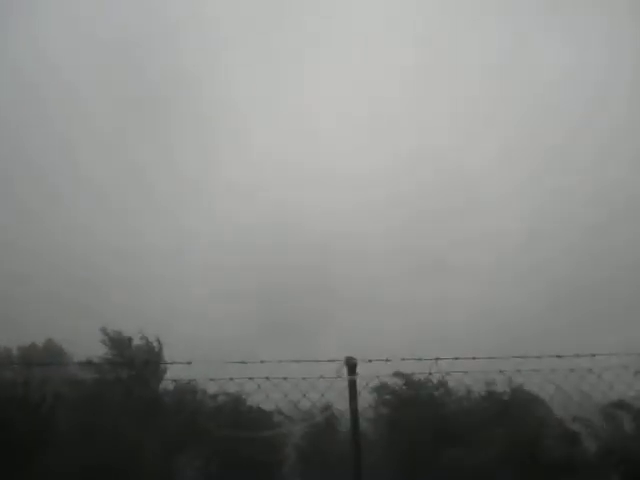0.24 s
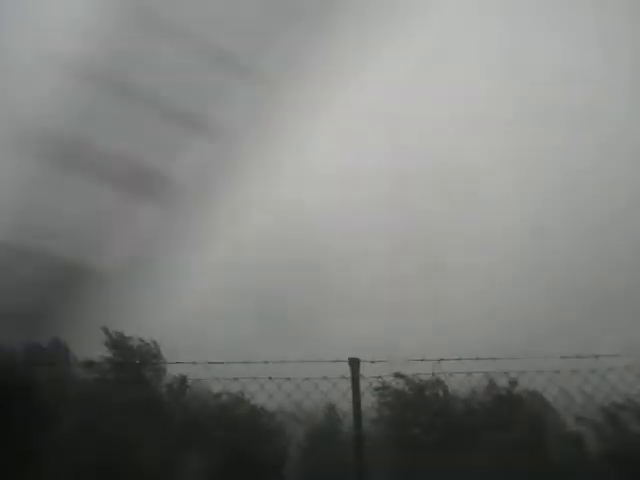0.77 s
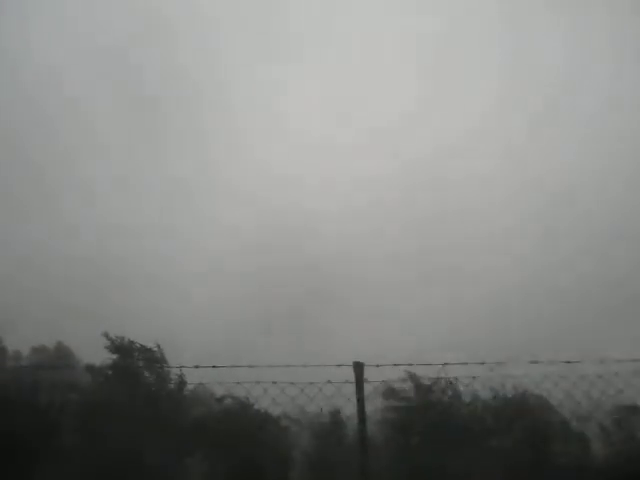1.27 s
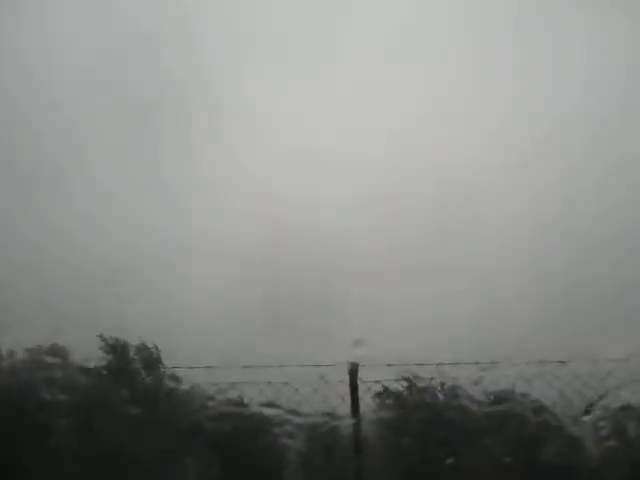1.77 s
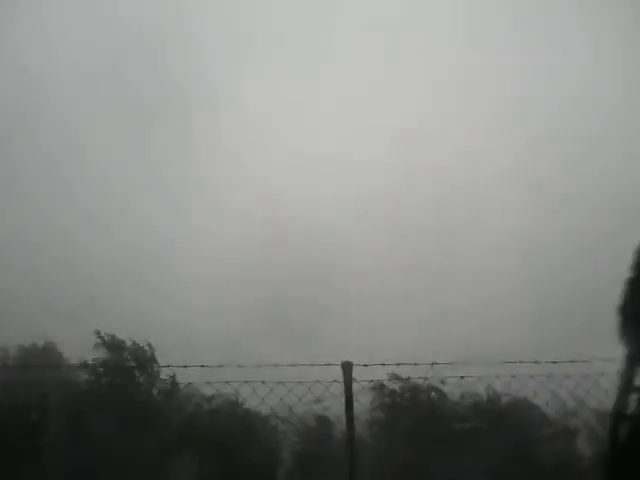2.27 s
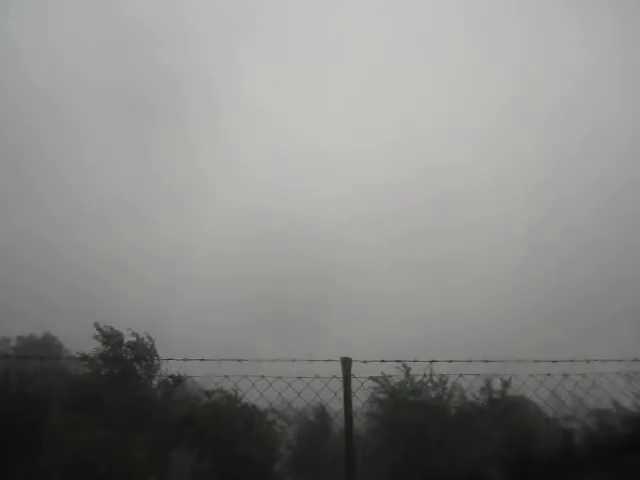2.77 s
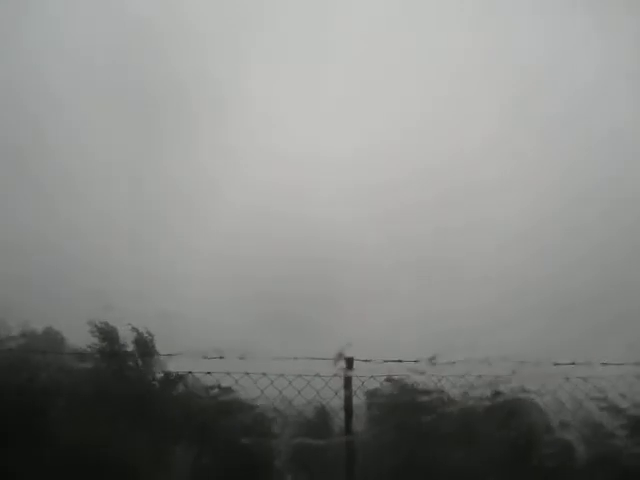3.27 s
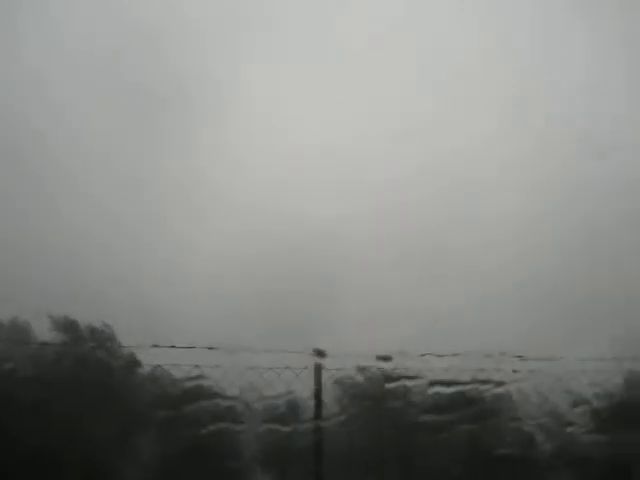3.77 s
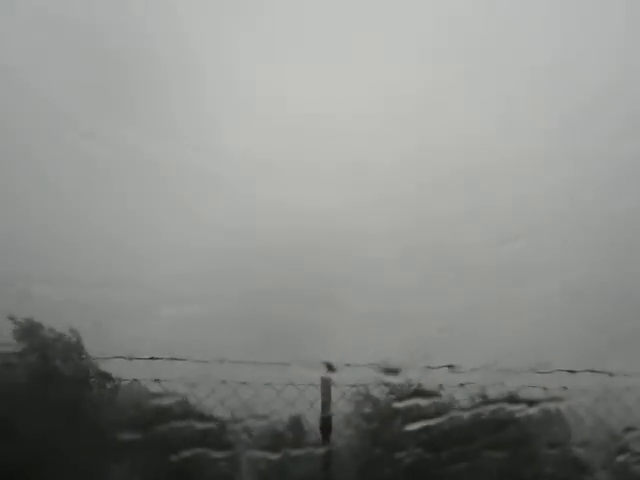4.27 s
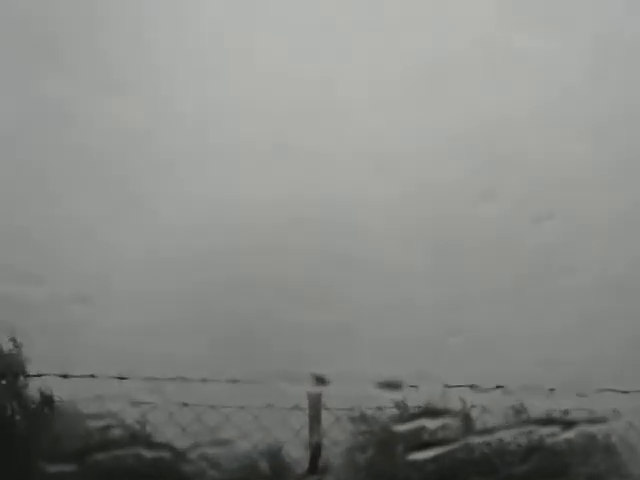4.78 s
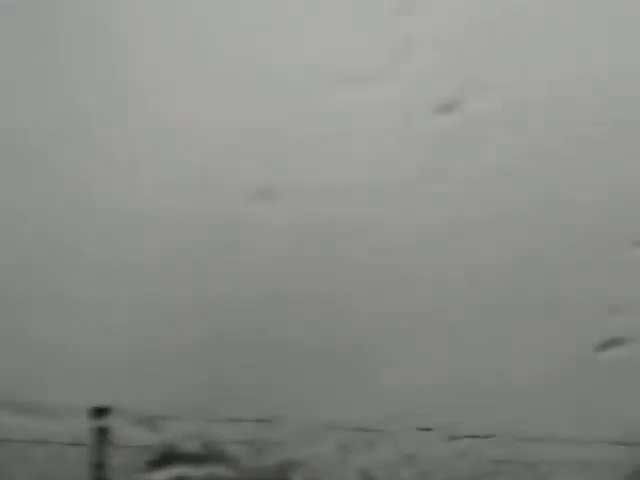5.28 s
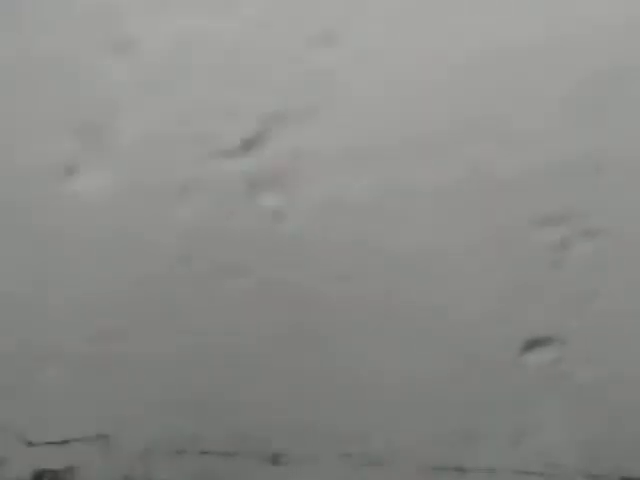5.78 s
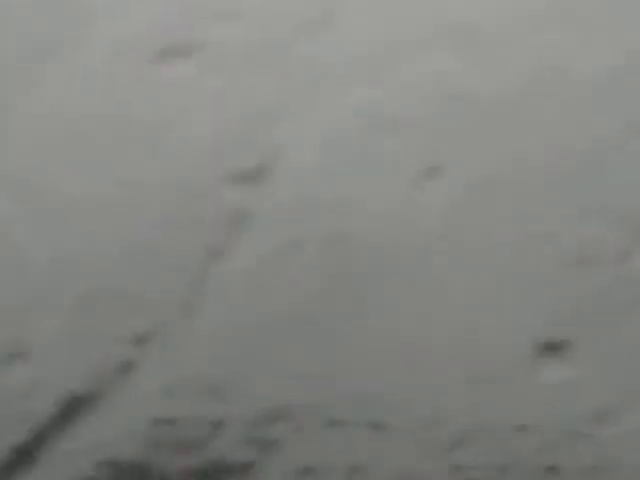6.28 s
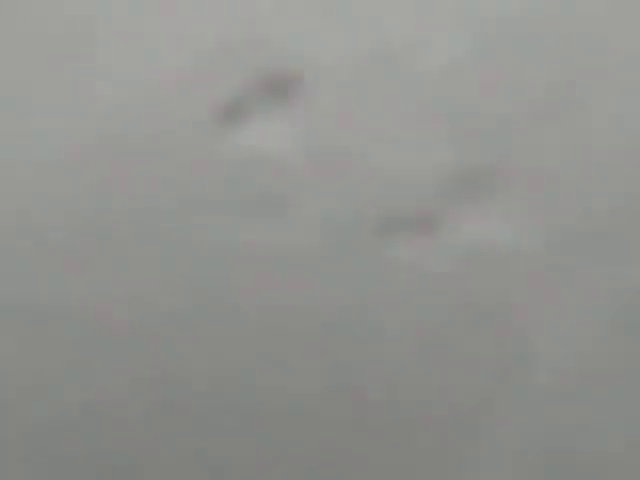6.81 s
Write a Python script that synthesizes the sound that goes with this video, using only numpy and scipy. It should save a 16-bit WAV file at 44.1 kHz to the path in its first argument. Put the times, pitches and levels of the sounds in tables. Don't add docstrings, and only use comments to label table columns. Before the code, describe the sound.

Inside a storm-shaken car, sheets of rain and low thuds give way to handling clicks, dulled rain, and harsh fluttering air blasts

```python
import sys
import numpy as np
from scipy import signal
from scipy.fft import rfft, irfft, next_fast_len
from scipy.io import wavfile
from scipy.ndimage import uniform_filter1d

SR = 44100
rng = np.random.default_rng(int(sys.argv[2]) if len(sys.argv) > 2 else 0)


def file_out(sig):
    cols = np.atleast_2d(sig).T
    lim = np.clip(cols, -1, 1)
    pcm = np.round(lim * 32767).astype(np.int16)
    wavfile.write(sys.argv[1], SR, pcm)


def amplitude_ratio(level_db):
    exponent = np.asarray(level_db, float) / 20
    return 10 ** exponent


N = 310772
STEP_S = .001

# (time [s], share [0-1])
SHADE = [
    (0, 0.04),
    (3.5, 0.06),
    (3.62, 0.28),
    (4.7, 0.43),
    (4.95, 0.04),
    (5.3, 0.05),
    (6.4, 0.05),
    (6.8, 0.1),
    (7.05, 0.04),
]


def unit(x):
    return x / np.sqrt(np.mean(x ** 2) + 1e-18)


def steps():
    return np.arange(0, N / SR + STEP_S, STEP_S)


def curve(s, v):
    return np.interp(np.arange(N) / SR, s, v)


def band(x, lo_hz, hi_hz, order=2):
    return signal.sosfilt(signal.butter(order, [lo_hz, min(hi_hz, .47 * SR)], "band", fs=SR, output="sos"), x)


def low(x, hz):
    return signal.sosfilt(signal.butter(3, hz, fs=SR, output="sos"), x)


def colour(x, spectrum):
    size = next_fast_len(len(x))
    hz = np.maximum(np.fft.rfftfreq(size, 1 / SR), 1)
    point_hz, point_db = np.transpose(spectrum)
    db = np.interp(np.log(hz), np.log(point_hz), point_db, left=-90)
    return irfft(rfft(x, size) * amplitude_ratio(db), size)[:len(x)]


def walk(rate):
    hold = int(SR / rate)
    levels = rng.standard_normal(N // 8)[:N // hold + 1]
    return 0.678 * uniform_filter1d(np.repeat(levels, hold)[:N], hold)


def drops(rate, spread_db):
    hit = rng.random(N) < rate / SR
    return unit(hit * rng.standard_normal(N) * amplitude_ratio(spread_db * rng.exponential(size=N)))


def steady(x, lo_hz, hi_hz):
    return x / np.sqrt(uniform_filter1d(band(x, lo_hz, hi_hz) ** 2, SR // 2) + 1e-18)


def swell_db(start_s, hold_s, rise_s, fall_s):
    early = np.maximum(start_s - steps(), 0)
    late = np.maximum(steps() - start_s - hold_s, 0)
    return -20 * (early / rise_s + late / fall_s)


def storm_db():
    # (time [s], level [dB])
    strength = [(0, -37.5), (.26, -41), (.58, -39.5), (1.76, -38.5), (1.86, -40.5), (2.19, -45.5),
                (2.33, -36), (2.5, -34), (2.77, -39.5), (3.1, -40), (3.5, -42), (4.5, -48.5), (4.86, -46.5),
                (5.02, -37), (5.62, -32), (6.62, -37.5), (6.82, -39), (7.05, -30)]
    # (time [s], swell [dB], half length [s])
    sheets = [
        (0.702, 4, 0.112),
        (0.911, 2.5, 0.062),
        (1.157, 3, 0.0213),
        (1.216, 3.5, 0.0636),
        (1.352, 3.5, 0.104),
        (1.593, 2.5, 0.0237),
        (1.654, 4, 0.0925),
        (2.368, 2, 0.0454),
        (2.948, 3, 0.1336),
    ]
    swells = sum(db * np.exp(-((steps() - s) / half_s) ** 4) for s, db, half_s in sheets)
    return np.interp(steps(), *np.transpose(strength)) + swells


def rain(roof_db, glass_db):
    # (frequency [Hz], density [dB per Hz])
    open_spectrum = [(140, -40), (250, 5), (560, 12.5), (680, 5.5), (1140, 9), (1500, 0.5), (1950, -5),
                     (2300, -15), (3250, -7.5), (3870, -14.5), (4500, -14.5), (5320, -26), (6400, -24.5),
                     (7400, -33), (15900, -49.5)]
    shaded_spectrum = [(150, -31), (230, -16), (320, -16), (560, -14), (700, -16.5), (880, -8), (1400, -14),
                       (1860, -2.5), (2150, -28.5), (3300, -43.5), (4500, -40.5), (5500, -35), (15900, -45)]
    shade = np.clip(curve(*np.transpose(SHADE)), 0, 1)
    wash = rng.standard_normal(N) + .3 * drops(2500, spread_db=2.0)
    wash = wash * amplitude_ratio(.7 * walk(25) + .9 * walk(90))
    heard = (1 - shade) * unit(colour(wash, open_spectrum)) + shade * unit(colour(wash, shaded_spectrum))
    roof = signal.sosfiltfilt(signal.butter(6, 2250, fs=SR, output="sos"), heard)
    glass = heard - roof
    return steady(roof, 500, 1900) * amplitude_ratio(roof_db + .6) + steady(glass, 2500, 5500) * amplitude_ratio(glass_db + .6)


def shoves(steady_db):
    # (time [s], boom [dB], shudder [dB], time to fade 20 dB [s])
    gusts = [(0.01, -19, -34, 0.1867), (.45, -30.5, -32, 0.13), (.66, -29, -42, 0.19), (.9, -33, -36, 0.27),
             (1.05, -23, -30.5, 0.13), (1.43, -21.5, -34, 0.13), (1.53, -25.5, -32, 0.11),
             (1.66, -20, -29.5, 0.09), (1.74, -24, -24.5, 0.32), (1.93, -34, -33.5, 0.22),
             (2.22, -36, -55, 0.23), (2.36, -29, -38, 0.02), (2.43, -26, -30, 0.05),
             (2.49, -25, -46.5, 0.38), (3.385, -19.5, -43, 0.3032), (3.59, -29, -39.5, 0.13),
             (3.67, -26, -45.5, 0.28), (4.04, -37, -61.5, 1.26), (4.44, -28.5, -45.5, 0.07),
             (4.55, -35, -46, 0.31), (5.04, -31.5, -36.5, 0.11), (5.13, -21.5, -33, 0.116),
             (5.225, -37, -38.5, 0.1469), (5.47, -43, -48, .2), (5.95, -18.5, -43, 0.1662),
             (6.04, -25, -34, 0.05), (6.14, -23.5, -40.5, 0.265), (6.23, -21, -38, 0.09),
             (6.29, -22.5, -37, 0.093), (6.62, -33, -43, 0.3)]
    power = amplitude_ratio(2 * (steady_db + np.array([[-39.5], [-38.5]])))
    for s, boom_db, shudder_db, fade_s in gusts:
        swell = swell_db(s, 0.0253, 0.0634, fade_s)
        power = power + amplitude_ratio(2 * (swell + np.array([[boom_db], [shudder_db]])))
    return 10 * np.log10(power)


def body(boom_db, shudder_db):
    air = band(rng.standard_normal(N), 18, 56, order=3)
    boom = unit(air) * amplitude_ratio(boom_db - 0.75 + 0.799 * walk(11))
    panels = band(rng.standard_normal(N), 84.6, 201.9)
    shudder = unit(panels) * amplitude_ratio(shudder_db + 2.5 + 2.97 * walk(30))
    return boom + shudder


def thumps():
    # (time [s], peak [dB], ring [Hz], decay [ms])
    jolts = [(0.52, -20, 109.3, 16.6), (1.019, -17.5, 120.4, 12), (1.04, -14, 95.3, 19.6),
             (1.42, -19, 70.8, 19.8), (1.979, -18, 170.3, 19.7), (2.349, -24, 112, 24.5),
             (2.479, -18.5, 91.5, 20.4), (3.068, -20.5, 111.4, 17.5), (3.811, -29.5, 385.3, 7),
             (4.438, -25, 119.2, 14.1), (6.618, -28, 341.6, 7.8)]
    out, ms = np.zeros(N), np.arange(6000) / SR * 1000
    for s, db, hz, decay_ms in jolts:
        at = int(s * SR)
        ring = np.sin(2 * np.pi * hz * ms / 1000) * np.exp(-ms / decay_ms)
        out[at:at + len(ms)] += amplitude_ratio(db) * ring * (1 - np.exp(-ms / 1.9))
    return out


def port(x):
    vent_hz, q = 125, .65
    w = np.tan(np.pi * vent_hz / SR)
    return signal.lfilter([1, -2, 1], [1 + w / q + w * w, 2 * (w * w - 1), 1 - w / q + w * w], x)


def flutter():
    # (start [s], length [s], low buffet [dB], rasp [dB], drift over the blast [dB])
    blasts = [(3.601, .03, -42, -41, 7), (4.949, 0.114, -46.5, -44, 4.5), (5.094, 0.066, -37, -40.5, 5.5),
              (5.161, 0.0616, -29.5, -34, -8), (5.453, 0.0122, -59.5, -55.5, -1.5),
              (5.534, 0.0146, -44.5, -43, -0.5), (5.883, 0.034, -43, -48.5, 12.5),
              (5.92, 0.0404, -30, -34.5, 6), (5.959, 0.0885, -21.5, -29.5, -4.5),
              (6.102, .037, -26, -24.5, -2), (6.141, 0.0376, -29, -26, -6.5),
              (6.178, 0.124, -37.5, -36.5, 1), (6.298, 0.1437, -28, -35, -17)]
    # (frequency [Hz], density [dB per Hz])
    rasp_spectrum = [(200, -9), (600, -2.5), (900, -8.5), (1800, -20), (4000, -35), (8000, -50.5),
                     (16000, -74.5)]
    swarm = np.abs(drops(700, spread_db=3.5))
    soft = port(-low(swarm, 420))
    rasp = colour((rng.standard_normal(N) - 0.305 * swarm) * amplitude_ratio(1.7 * walk(220)), rasp_spectrum)
    crackle = band(drops(120, spread_db=2.5), 1510, 8000, order=1)
    t, buffet_gain, rasp_gain = steps(), 0, 0
    for s, length_s, buffet_db, rasp_db, drift_db in blasts:
        drift = drift_db * np.clip((t - s) / length_s, 0, 1)
        on = amplitude_ratio(swell_db(s, length_s, rise_s=0.017, fall_s=0.02) + drift)
        buffet_gain = np.maximum(buffet_gain, on * amplitude_ratio(buffet_db))
        rasp_gain = np.maximum(rasp_gain, on * amplitude_ratio(rasp_db))
    edges = unit(rasp) + amplitude_ratio(-35) * unit(crackle)
    return unit(soft) * curve(t, buffet_gain) + edges * curve(t, rasp_gain)


def choke():
    # (time [s], length [ms])
    stuck = [
        (6.1795, 5),
        (6.190, 6),
        (6.2025, 4),
        (6.277, 4),
    ]
    ms = np.arange(N) / SR * 1000
    shut = sum((ms > 1000 * s) & (ms < 1000 * s + length_ms) for s, length_ms in stuck)
    return 1 - .95 * uniform_filter1d(np.clip(shut, 0, 1.), size=40)


def all_pops():
    # (time [s], depth [dB], fall [ms], return [ms])
    sharp = [(3.5179, 1.5, 0.26, 0.38), (3.5584, -4, 0.0433, 0.88), (5.119, -2.5, 0.316, 1),
             (5.1297, -10, 0.234, .54), (5.1447, -3.5, 0.118, 0.44), (5.1647, -4, 0.37, 0.71),
             (5.1706, -5, .29, 0.466), (5.173, 2, 0.04, 0.222), (5.1765, -5.5, 0.085, 0.66),
             (5.1791, -1.5, 0.051, 0.83), (5.1843, -6, 0.06, 0.3), (5.188, -2.5, 0.031, 0.48),
             (5.1929, -5.5, .088, .54), (5.2, -5.5, .078, .99), (5.2075, -13.5, .075, .24),
             (5.2126, -5, 0.09, 0.35), (5.22, -16, 0.33, 0.32), (5.2263, -17.5, .1, .3),
             (5.368, -29.5, 0.274, .36), (5.3815, -27.5, 0.136, .99), (5.4033, -27, .093, .47),
             (5.424, -28.5, 0.083, 0.39), (5.5381, -14.5, 0.0974, 1), (5.5479, -14, .072, .5),
             (6.0153, -1.5, 0.147, 1), (6.0225, -2.5, 0.082, 0.344), (6.0317, -5.5, 0.034, 0.33),
             (6.0368, -6, 0.0337, 0.78), (6.0401, -3, 0.0484, 0.427), (6.0504, -7, 0.128, 0.97)]
    # (time [s], depth [dB], fall [ms])
    puffs = [(3.5213, -22, 0.53), (3.5702, -28, 1.44), (3.6009, -14.5, 0.27), (4.973, -12.5, 0.79),
             (5.0149, -18.5, .74), (5.0257, -14, 0.88), (5.0534, -15, 0.92), (5.0616, -17.5, 0.43),
             (5.9195, -15, 1.06), (5.943, -14, 1.47), (5.9534, -11, 0.42), (5.9746, -6, 0.75),
             (5.992, -7.5, 0.257), (6.0037, -13.5, 2.1), (6.009, -16, .9), (6.0458, -8.5, 0.41),
             (6.144, -23, 0.64), (6.17, -22, 0.67), (6.1981, -21.5, .34), (6.2748, -22, 0.97)]
    # (start [s], spacing [ms], depth [dB], fall [ms])
    runs = [
        (3.61, 4.22, -22, 0.267),
        (5.4805, 5.8, -29.5, 0.103),
        (6.1012, 3.9, -10.5, 0.18),
    ]
    run_counts = [5, 6, 8]
    rows = [*sharp, *((s, db, fall_ms, 0.793) for s, db, fall_ms in puffs)]
    for (s, spacing_ms, db, fall_ms), count in zip(runs, run_counts):
        late, size = rng.standard_normal((count, 2)).T
        order = np.arange(count)
        times = s + (order + 0.255 * late * (order > 0)) * spacing_ms / 1000
        rows += [(at, db + 3 * k, fall_ms, 0.307) for at, k in zip(times, size)]
    return rows


def pops():
    # (time [s], peak [dB], width [ms])
    pushes = [
        (1.931, -28, 1.33),
        (4.611, -25, 1.03),
        (6.0407, -3, 0.59),
        (6.1862, -18, 1.7),
        (6.208, -23, 2.25),
        (6.284, -30, 3.1),
        (6.3, -24, 2),
    ]
    before = 600
    out, ms = np.zeros(N), np.arange(-before, 1500) / SR * 1000
    for s, db, fall_ms, back_ms in all_pops():
        let_go = np.exp(-(np.abs(ms) / (2.5 * back_ms)) ** 1.5)
        suction = np.where(ms < 0, np.exp(ms / fall_ms), let_go)
        round_off = 1 + int(.5 * fall_ms * SR / 1000)
        shape = port(uniform_filter1d(uniform_filter1d(suction, round_off), round_off))
        at = int(s * SR) - before
        out[at:at + len(ms)] -= shape / shape.max() * amplitude_ratio(db + 2.14 * (db > -4.5))
    for s, db, width_ms in pushes:
        shape = port(np.exp(-(ms / width_ms) ** 2))
        at = int(s * SR) - before
        out[at:at + len(ms)] += shape / shape.max() * amplitude_ratio(db)
    return out


def ticks():
    # (time [s], peak [dB], low knock [dB], length [ms], brightest [Hz])
    cracks = [(3.4044, -15, -39.5, 2.2, 5600), (3.4189, -14.5, -37, 3.1, 5400),
              (3.4216, -8.5, -38.5, 1.2, 5400), (3.588, -40, -10.5, 2.1, 6000),
              (3.6961, -44, -20, 1.01, 6500), (3.792, -41.5, -22, 1.33, 6430),
              (3.809, -28, 4.5, 0.63, 5000), (3.8304, -27, -8.5, 1.63, 4500), (6.544, -60, -14, 1.2, 8000),
              (6.615, -60.5, 25.5, 1.5, 2500), (6.6792, -18.5, -15, 0.646, 2700),
              (6.7042, -18, -14.5, 1.53, 4600), (6.884, -23.5, -38, 2.1, 6600)]
    # (frequency [Hz], width [Hz], level [dB])
    case_modes = [(2040, 910, 8), (3280, 834, 6.5), (4997, 1490, 4), (6124, 1800, -2), (8600, 2600, -7),
                  (12000, 3500, -25)]
    # (frequency [Hz], level [dB], decay [ms])
    case_rings = [(1860, -6, 6), (4750, -28, 20)]
    # (time [s], level [dB])
    ringing = [
        (3.4041, -28),
        (3.4219, -24.5),
        (6.6794, -33),
        (6.7042, -29),
    ]
    out, ms = np.zeros(N), np.arange(4000) / SR * 1000
    for s, db, knock_db, length_ms, top_hz in cracks:
        noise = rng.standard_normal(len(ms))
        crack = noise * (np.exp(-ms / (0.544 * length_ms)) + 0.0504 * np.exp(-ms / 9))
        ring = 0
        for hz, width_hz, mode_db in case_modes:
            tilt_db = -4 * np.log2(hz / top_hz) ** 2
            ring = ring + amplitude_ratio(mode_db + tilt_db) * band(crack, hz - width_hz / 2, hz + width_hz / 2)
        ring = band(ring, 1200, 13000)
        knock = band(noise * np.exp(-ms / 3), 393, 976)
        tick = ring / np.abs(ring).max() + amplitude_ratio(knock_db) * knock / np.abs(knock).max()
        at = int(s * SR)
        out[at:at + len(ms)] += amplitude_ratio(db) * tick
    long_ring = sum(amplitude_ratio(db) * np.sin(2 * np.pi * hz * ms / 1000) * np.exp(-ms / decay_ms)
                    for hz, db, decay_ms in case_rings)
    for s, db in ringing:
        at = int(s * SR)
        out[at:at + len(ms)] += amplitude_ratio(db) * long_ring
    return out


def hiss(spray_db):
    # (frequency [Hz], density [dB per Hz])
    self_noise_spectrum = [(3000, -38), (7000, -1.5), (11000, -6.5), (15900, -13.5), (16100, -38.5)]
    slow_db = uniform_filter1d(spray_db, SR // 4)
    return unit(colour(rng.standard_normal(N), self_noise_spectrum)) * amplitude_ratio(0.6467 * slow_db - 38.5)


def gain_db():
    # (time [s], depth [dB])
    ducks = [
        (3.518, -15),
        (5.115, -7.5),
        (5.165, -30.5),
        (6.03, -23),
        (6.34, -24),
    ]
    drop_s, recover_db_per_s = 0.0188, 14
    t = steps()
    dips = [np.clip((t - s) / drop_s, 0, 1) * np.minimum(db + recover_db_per_s * (t - s), 0)
            for s, db in ducks]
    return np.min(dips, axis=0)


def scene():
    roof, gain = storm_db(), gain_db()
    storm = roof + 40
    spray = -51 + 1.084 * storm
    shade_loss = -6.5 * np.interp(steps(), *np.transpose(SHADE))
    glass = spray + gain + shade_loss
    boom, shudder = shoves(0.606 * storm + gain)
    controls = (roof + gain, glass, spray, gain, boom, shudder)
    roof_db, glass_db, spray_db, duck_db, boom_db, shudder_db = (curve(steps(), c) for c in controls)
    mic_hiss = hiss(spray_db) * amplitude_ratio(0.764 * duck_db)
    fine = (rain(roof_db, glass_db) + flutter() + mic_hiss) * choke()
    return (fine + body(boom_db, shudder_db) + thumps() + pops() + ticks())[None]


def band_limit(x):
    return signal.sosfilt(signal.butter(12, 16520, fs=SR, output="sos"), x)


def record(dry):
    ceiling, top_hz = .71, 16050
    top_cut = signal.ellip(6, .1, 30, top_hz, fs=SR, output="sos")
    mix = signal.sosfiltfilt(top_cut, np.clip(dry, -ceiling, ceiling))
    return band_limit(mix)


dry = scene()
out = record(dry)
file_out(out)
```